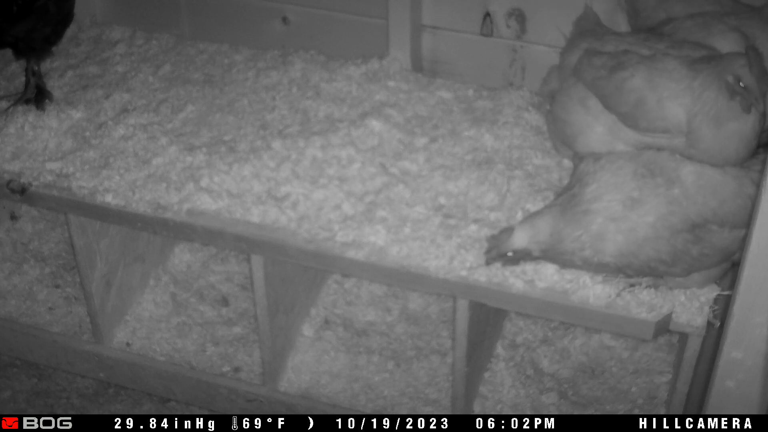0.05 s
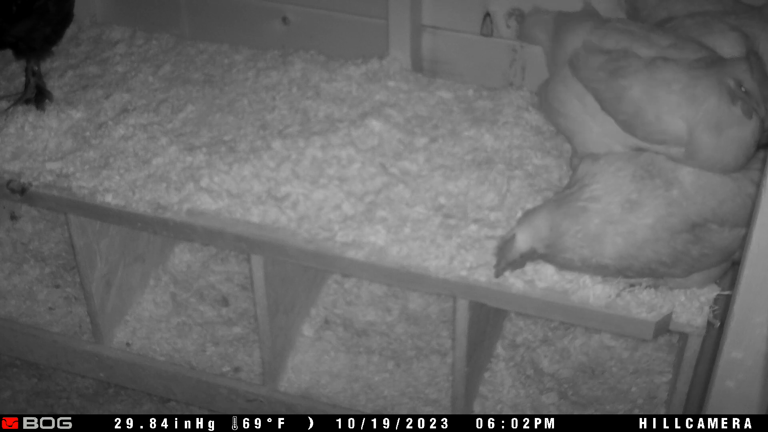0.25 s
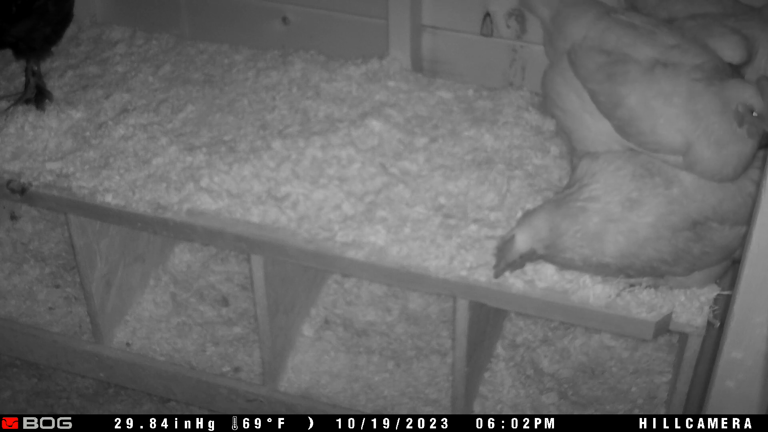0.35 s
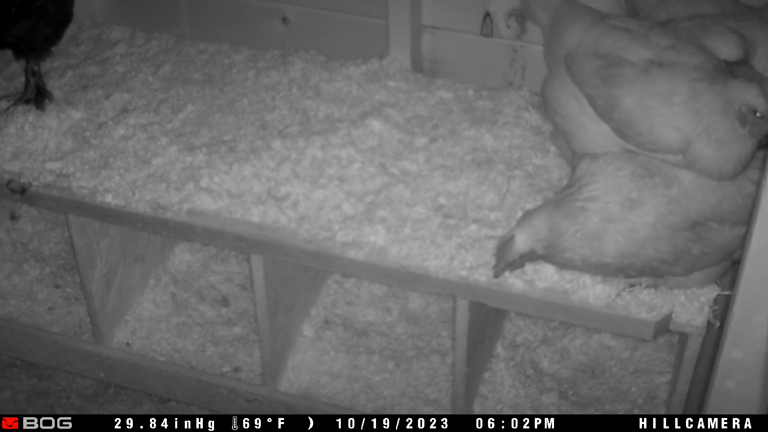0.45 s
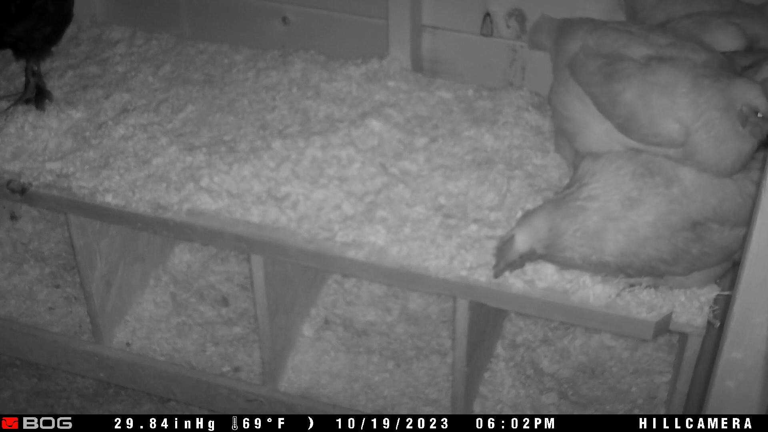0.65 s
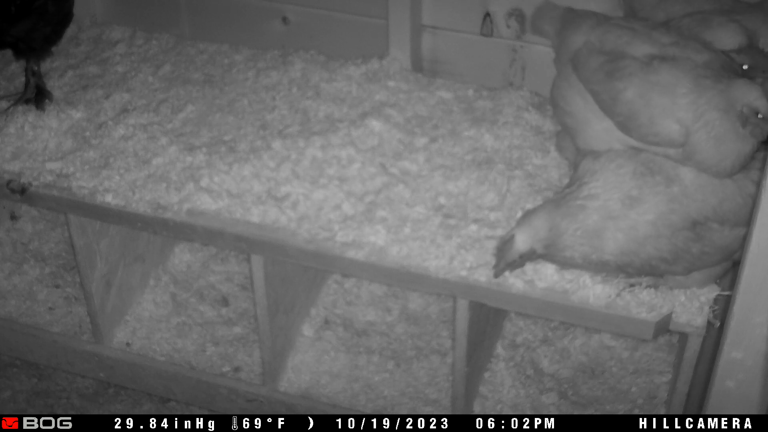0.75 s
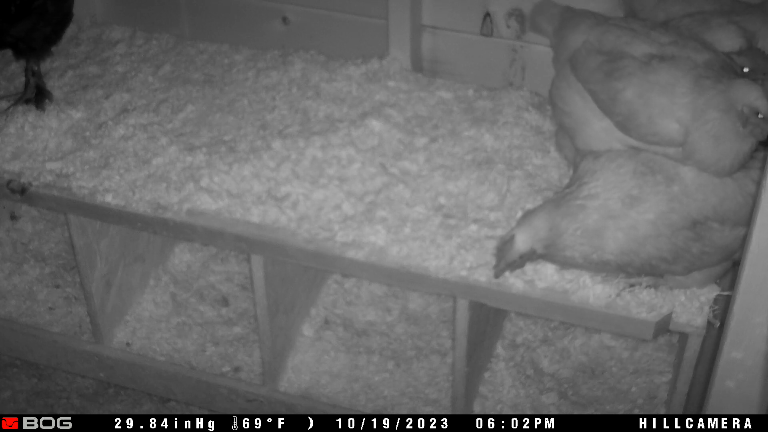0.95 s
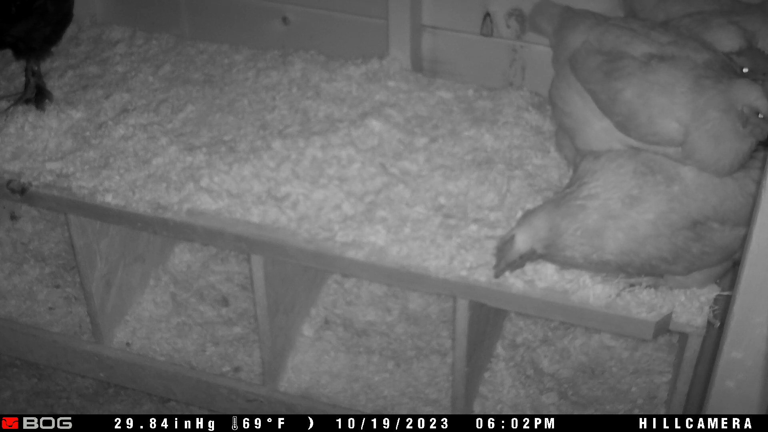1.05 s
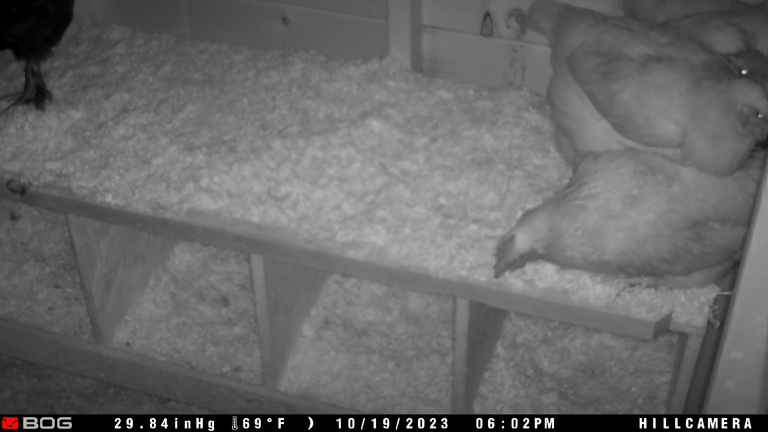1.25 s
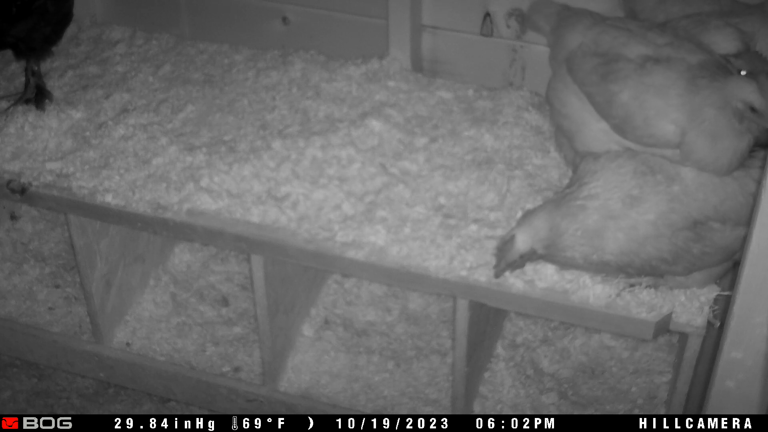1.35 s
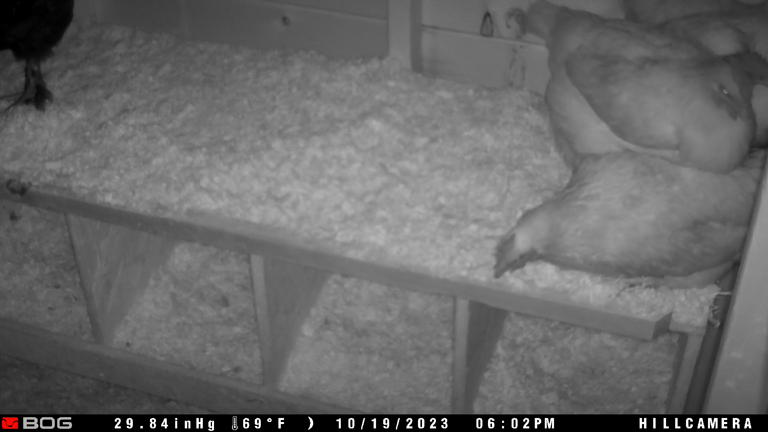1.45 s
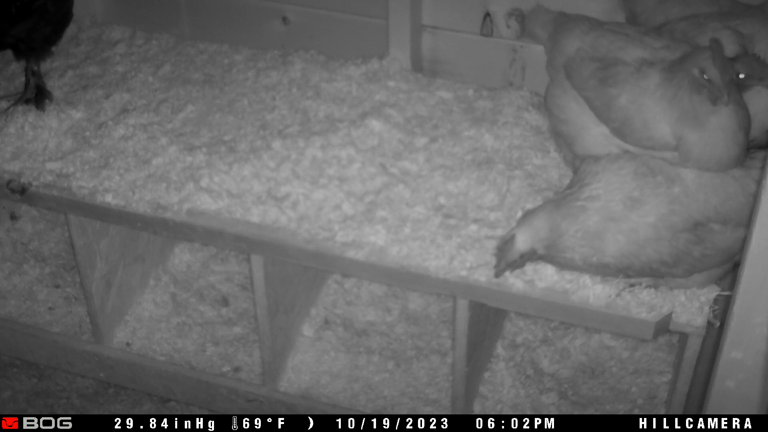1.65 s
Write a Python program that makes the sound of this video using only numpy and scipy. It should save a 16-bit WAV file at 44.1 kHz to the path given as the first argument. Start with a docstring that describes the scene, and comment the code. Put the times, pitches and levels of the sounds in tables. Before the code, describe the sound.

A hen bumps wood with one short, clattering knock, just after a quick scuff along the boards. The plywood coop rings briefly, then feathers and shavings rustle faintly over a small microphone's steady hiss.

```python
"""Night in a plywood coop, under the steady hiss of a small camera's microphone.
A hen shifts her weight on the wood shavings, then scuffs along the boards in quick, overlapping strokes.
She bumps the wood once: a short clatter, and the boards and the coop ring briefly.
Faint rustles of feathers and litter follow, with a soft murmur from the floor."""
import sys
import numpy as np
from scipy import signal
from scipy.fft import rfft, irfft
from scipy.io import wavfile

SR = 44100
rng = np.random.default_rng(int(sys.argv[2]) if len(sys.argv) > 2 else 0)


def to_wav(sig):
    """Store sig (one row per channel, or 1-D mono) as 16-bit WAV at the path in sys.argv[1].

    Samples outside -1..1 are clipped; the rate is SR.
    """
    pcm = np.clip(np.atleast_2d(sig), -1, 1) * 32767
    pcm = np.round(pcm).astype(np.int16)
    wavfile.write(sys.argv[1], SR, pcm.T)  # frames by channels


N = 74970
TIME, HZ = np.arange(N) / SR, np.fft.rfftfreq(N, 1 / SR)
GRAINS_PER_S, GRAIN_SPREAD_DB = 2800, 2


def amp(db):
    """Decibels to gain."""
    return 10 ** (np.asarray(db) / 20)


def unit(x):
    """Scales to rms 1."""
    return x / np.sqrt(np.mean(x ** 2) + 1e-20)


def curve_at(points, hz):
    """Reads (frequency, value) points on a log-frequency axis."""
    f, value = np.transpose(points)
    return np.interp(np.log(hz + 1), np.log(f + 1), value)


def colour(x, eq):
    """Minimum-phase EQ; the result has rms 1, so the curve sets only the tone."""
    log_gain = np.log(amp(curve_at(eq, abs(np.fft.fftfreq(N, 1 / SR)))))
    response = np.exp(np.conj(signal.hilbert(log_gain)))
    return unit(irfft(rfft(x) * response[:len(HZ)], N))


def resonate(x, resonances):
    """Parallel band-passes, each with its own share of the power; the result has rms 1."""
    response = sum(amp(db) / np.sqrt(width) * 1j * HZ * width / (hz ** 2 - HZ ** 2 + 1j * HZ * width)
                   for hz, width, db in resonances)
    return unit(irfft(rfft(x) * response, N))


def grains():
    """A dense, gritty texture of tiny clicks of uneven size."""
    size = amp(GRAIN_SPREAD_DB * np.minimum(rng.exponential(1, N), 4))
    polarity = rng.choice([-1., 1.], N)
    return unit(size * polarity * (rng.random(N) < GRAINS_PER_S / SR))


def swells(rows):
    """Envelope of a few soft, bell-shaped movements."""
    return sum(amp(db) * np.exp(-.5 * ((TIME - centre) / sigma) ** 2) for centre, sigma, db in rows)


# EQ of the microphone's hiss and of the electronics' near-white fizz: f/Hz, level/dB
HISS_EQ = [(25, -18.5), (60, -16), (90, -13.5), (120, -6.5), (200, -6), (290, -5), (360, -4), (480, -4),
           (760, 0), (1100, 0), (1500, -1), (2200, -3), (2900, -6.5), (3500, -11), (4500, -17.5),
           (5500, -25), (6500, -32), (8000, -59.5), (12000, -65)]
FIZZ_EQ = [(100, -3.5), (7500, -2.5), (11000, -1), (15500, -1)]
HISS_DB, HISS_WAVER_DB, FIZZ_DB = -55.5, 0.38, -80.5


def hiss():
    """The bed: mid-heavy microphone hiss, barely wavering, over a faint electronic fizz."""
    slow_band = np.exp(-(HZ / 15) ** 2)
    waver = unit(irfft(rfft(rng.standard_normal(N)) * slow_band, N))
    body = amp(HISS_DB + HISS_WAVER_DB * waver) * colour(rng.standard_normal(N), HISS_EQ)
    return body + amp(FIZZ_DB) * colour(rng.standard_normal(N), FIZZ_EQ)


# Swells of the litter and of the floor: centre t/s, half-length t/s, level/dB
RUSTLES = [(0.094, 0.12, -56.5), (0.642, 0.12, -57.5), (0.741, 0.023, -66), (0.867, 0.044, -60.5),
           (1.314, 0.068, -61.5), (1.456, 0.044, -62.5), (1.667, 0.11, -61.5)]
WEIGHT_SHIFTS = [(.11, .05, -66), (.57, 0.037, -63), (.67, 0.052, -66.5)]
# EQ of the soft rustle and of the dull floor: f/Hz, level/dB
RUSTLE_EQ = [(150, -17.5), (600, -3.5), (1200, -3), (2600, -8), (4300, -20.5), (5500, -51), (9000, -77)]
FLOOR_EQ = [(60, -20), (120, 0.5), (350, 4), (900, -24), (4000, -48)]
# Low body of the floorboards: f/Hz, bandwidth/Hz, relative level/dB
FLOOR_RESONANCES = [(120.4, 14, -5.5), (170, 28, 0.5), (216, 21, -7), (361, 53, -1)]


def rustles():
    """Feathers and shavings rustle; the floorboards murmur under the hen's shifting weight."""
    floor = resonate(colour(grains(), FLOOR_EQ), FLOOR_RESONANCES)
    litter = colour(grains(), RUSTLE_EQ)
    return swells(RUSTLES) * litter + swells(WEIGHT_SHIFTS) * floor


def friction(envelope, eq, resonances, ring_db):
    """Tiny slips under a stroke, heard directly and, at ring_db relative to that, through the wood."""
    slips = colour(grains() * envelope, eq)
    wood = amp(ring_db) * resonate(slips, resonances)
    return unit(slips + wood) * np.sqrt(np.mean(envelope ** 2))


# Strokes along the boards: start t/s, attack t/s, decay t/s, rub level/dB, scratch level/dB
STROKES = [(0.189, 0.016, 0.039, -46.5, -47.5), (0.209, 0.018, 0.046, -40, -47.5),
           (0.241, 0.025, 0.029, -52.5, -42.5)]
# EQ of the rub and of the scratch: f/Hz, level/dB
RUB_EQ = [(80, -24), (200, -10), (550, -7.5), (850, -1.5), (1350, -7), (1800, -12), (4000, -39),
          (7000, -49), (10000, -91)]
SCRATCH_EQ = [(200, -27), (1000, -10), (2000, -0.5), (2900, 0), (4000, -12), (4600, -9), (5500, -29),
              (7000, -41), (10000, -83)]
# Woody ring of each layer: f/Hz, bandwidth/Hz, relative level/dB
RUB_RESONANCES = [(350, 59, 0), (826, 29, -0.5), (933, 31, -3.5), (1216, 39, 1), (1325, 180, 1.5)]
SCRATCH_RESONANCES = [(1752, 28, -6.5), (2230, 49, -5), (2570, 44, -10), (2900, 14, -3), (3650, 59, -2)]


def scuffs():
    """The hen scuffs the boards: each stroke layers a hollow rub with a brighter scratch."""
    rub_power, scratch_power = np.zeros(N), np.zeros(N)
    for start, attack, decay, rub_db, scratch_db in STROKES:
        rise = np.clip((TIME - start) / attack, 0, 1)
        stroke = rise * np.exp(-np.maximum(TIME - start - attack, 0) / decay)
        rub_power += (amp(rub_db) * stroke) ** 2
        scratch_power += (amp(scratch_db) * stroke) ** 2
    rub = friction(np.sqrt(rub_power), RUB_EQ, RUB_RESONANCES, ring_db=4)
    scratch = friction(np.sqrt(scratch_power), SCRATCH_EQ, SCRATCH_RESONANCES, ring_db=-10)
    return rub + scratch


BUMP_S, BASS_ATTACK_S, TREBLE_ATTACK_S, CROSSOVER_HZ = 0.357, 0.024, 0.0086, 420


def ring_envelope(hz, t60):
    """The ring blooms after the bump, the bass more slowly, then falls 60 dB in t60 seconds."""
    age = np.maximum(TIME - BUMP_S, 0)
    attack = BASS_ATTACK_S if hz < CROSSOVER_HZ else TREBLE_ATTACK_S
    bloom = np.minimum(age / attack, 1) ** 0.69
    return bloom * np.exp(-np.log(1000) * np.maximum(age - attack, 0) / t60)


# Transient, the contacts of the bump: t/s, pre-EQ level/dB
CONTACTS = [(.3573, -17.5), (.3627, -21.5), (.3675, -19.5), (.3747, -19)]
# EQ of the contacts: f/Hz, level/dB
CONTACT_EQ = [(60, -41), (130, 5), (600, -19.5), (1050, 3), (1500, -8.5), (2100, 1.5), (2900, 5.5),
              (3500, -18.5), (4700, -20), (6000, -57), (9000, -89)]
# Body, the modes of the boards and the air between them: f/Hz, level/dB, t60/s
BOARD_MODES = [(118, -56, 0.74), (174, -40, 0.16), (217, -44.5, .33), (270.7, -49.5, 0.33),
               (317, -45, 0.13), (344.7, -47, 0.37), (495, -59.5, 0.31), (895, -43, 0.24),
               (1007, -46, 0.14), (1093, -41.5, 0.19), (1724, -42, 0.28), (1910, -37.5, 0.17),
               (2129, -33.5, 0.094), (2793, -39, 0.16)]
# Tail, the coop's diffuse ring by band: f/Hz, relative level/dB, t60/s
COOP_BANDS = [(50, -27.5, 0.33), (101, -15.5, 0.41), (175, -1.5, 0.32), (350, 1, 0.26), (572, -12, 0.47),
              (1038, 3.5, .2), (1620, -4, .21), (2190, 0, 0.2), (2840, -8.5, 0.26), (3500, -11.5, 0.19),
              (4690, -18, 0.12), (5880, -39, 0.1), (9000, -91, 0.25)]
COOP_DB = -31.5


def bump():
    """The hen knocks the wood: a quick clatter of contacts, ringing boards and the coop's short tail."""
    clicks = np.zeros(N)
    for start, db in CONTACTS:
        clicks[round(start * SR)] += amp(db)
    clatter = colour(clicks, CONTACT_EQ) * np.sqrt(np.mean(clicks ** 2))
    boards = sum(amp(db) * ring_envelope(hz, t60) * np.sin(2 * np.pi * (hz * TIME + rng.random()))
                 for hz, db, t60 in BOARD_MODES)
    centres, levels, decays = np.transpose(COOP_BANDS)
    echo_spectrum = rfft(colour(grains(), np.c_[centres, levels]))
    tail = np.zeros(N)
    for solo, hz, t60 in zip(np.eye(len(COOP_BANDS)), centres, decays):
        band = curve_at(np.c_[centres, solo], HZ)  # crossfades into the neighbouring bands
        tail += irfft(echo_spectrum * band, N) * ring_envelope(hz, t60)
    return clatter + boards + amp(COOP_DB) * tail


def scene():
    """The hen's movements over the hiss, mixed in mono."""
    return (scuffs() + bump() + rustles() + hiss())[None]


def record(dry):
    """The camera's band limit: a steep high cut."""
    cutoff_hz = 15750
    high_cut = signal.firwin(511, cutoff_hz, window=("kaiser", 9), fs=SR)
    return signal.oaconvolve(dry, high_cut[None], "same")


dry = scene()
out = record(dry)
to_wav(out)
```